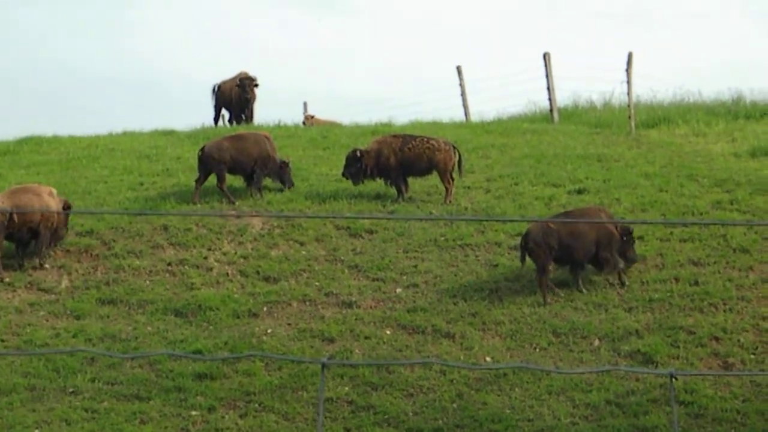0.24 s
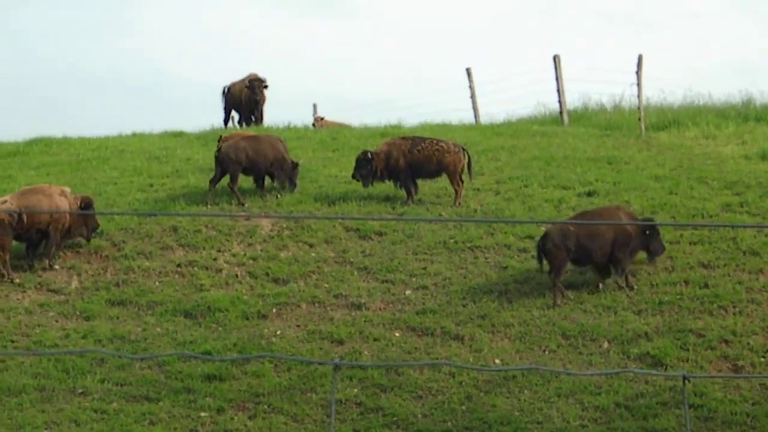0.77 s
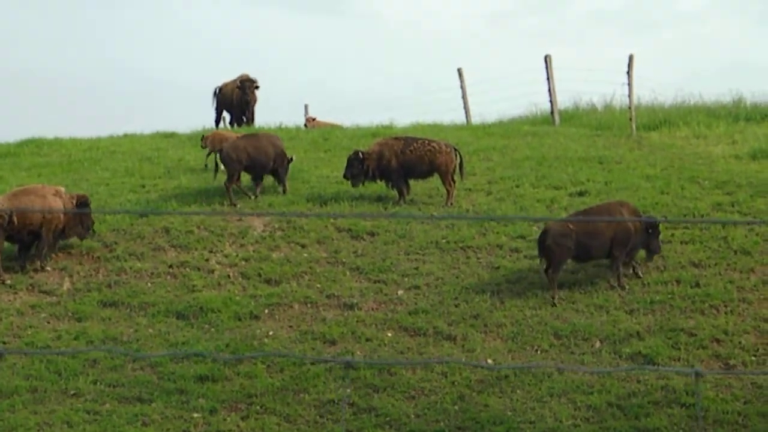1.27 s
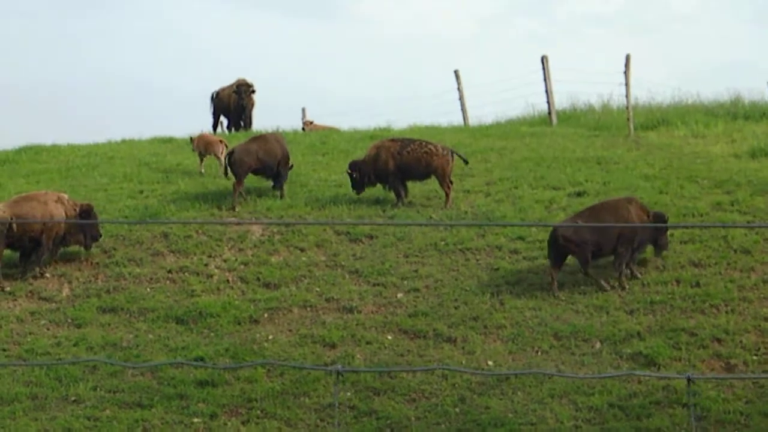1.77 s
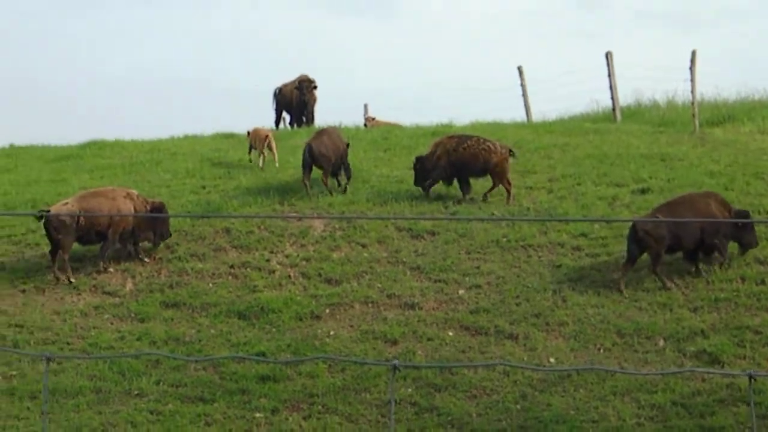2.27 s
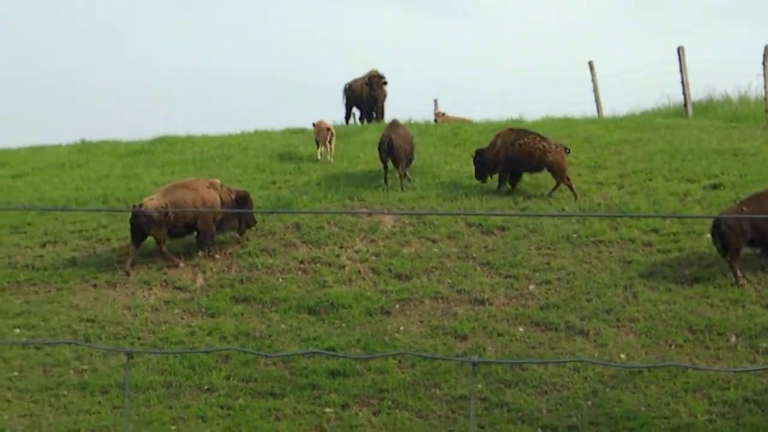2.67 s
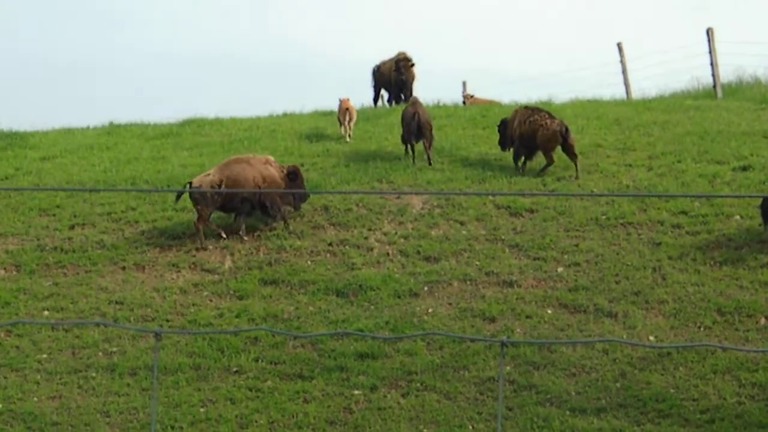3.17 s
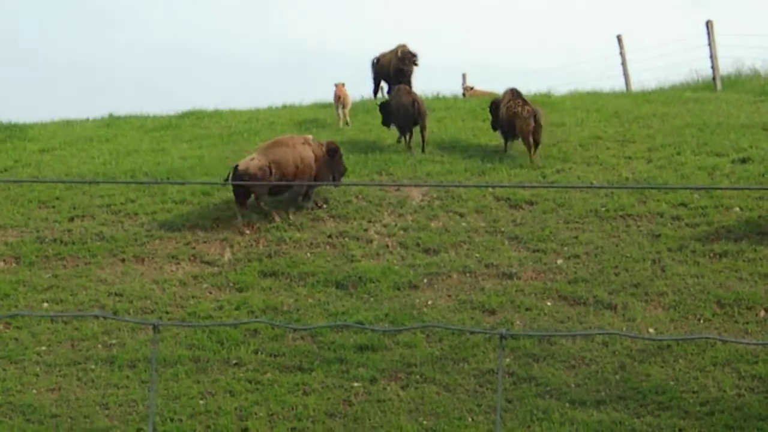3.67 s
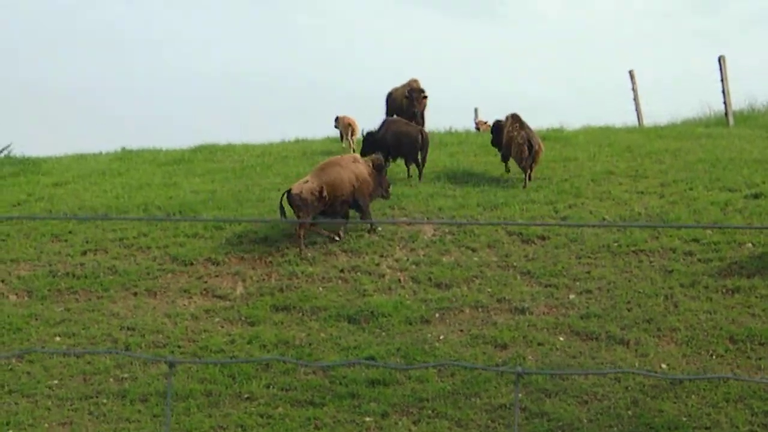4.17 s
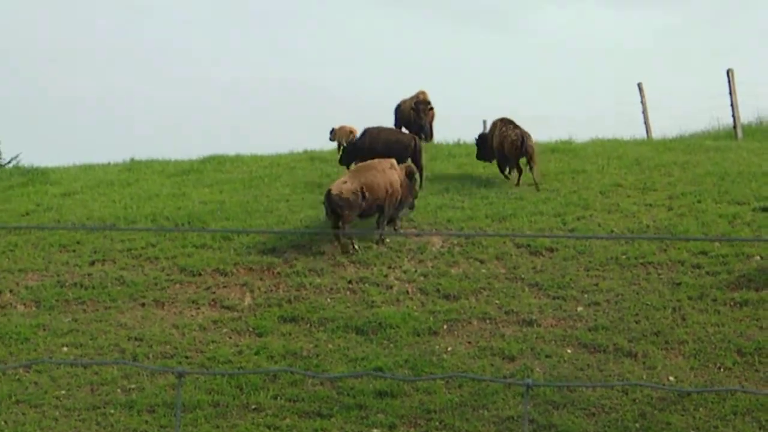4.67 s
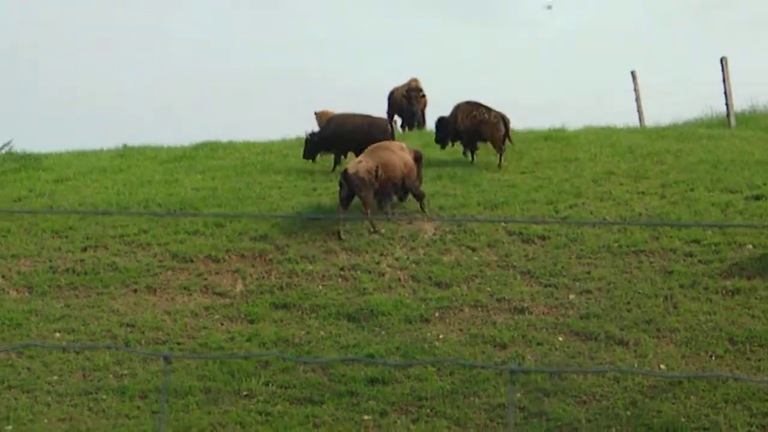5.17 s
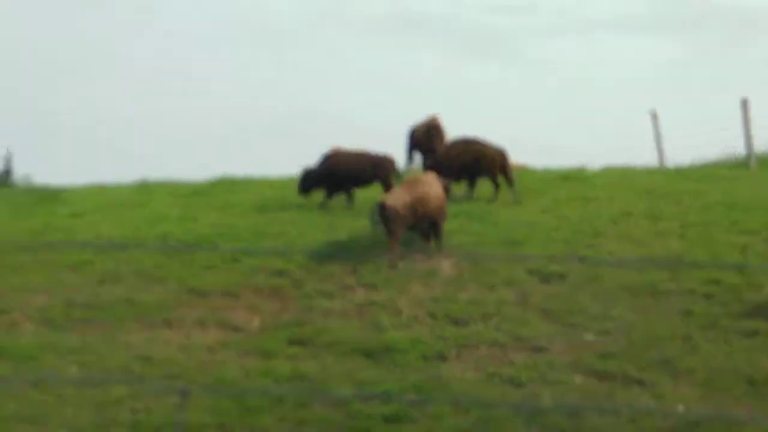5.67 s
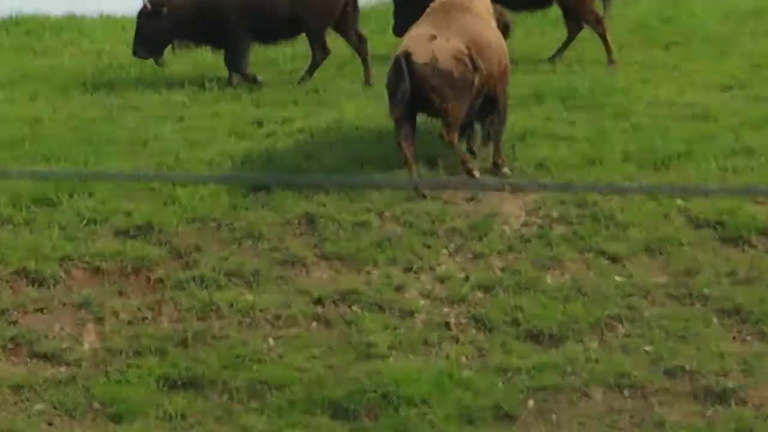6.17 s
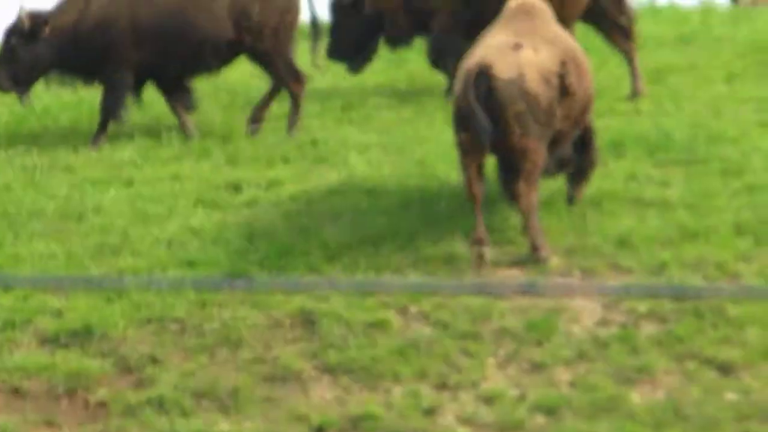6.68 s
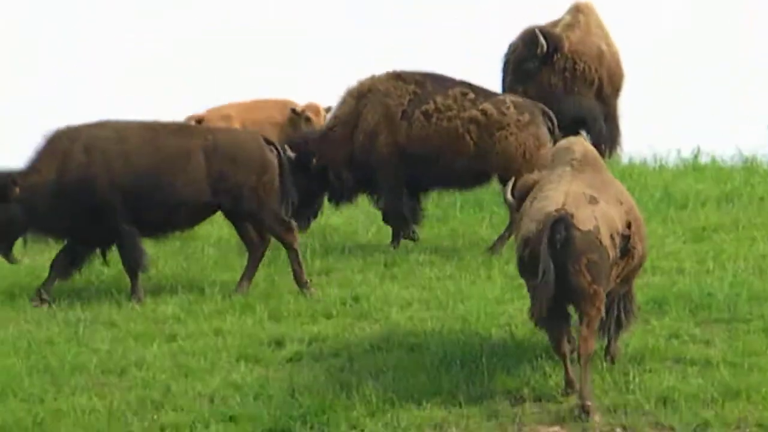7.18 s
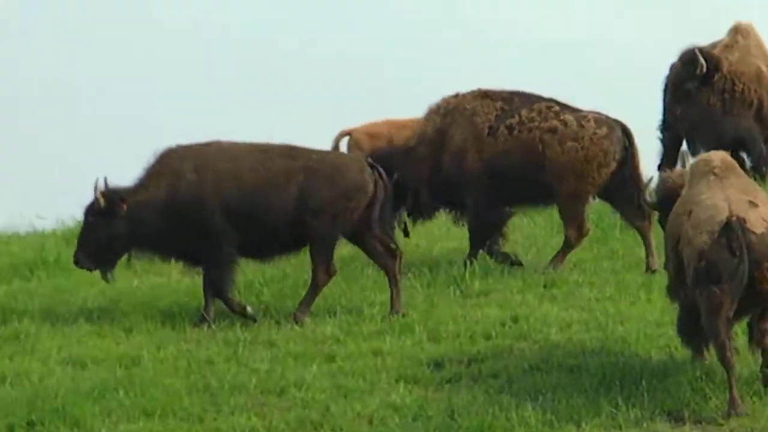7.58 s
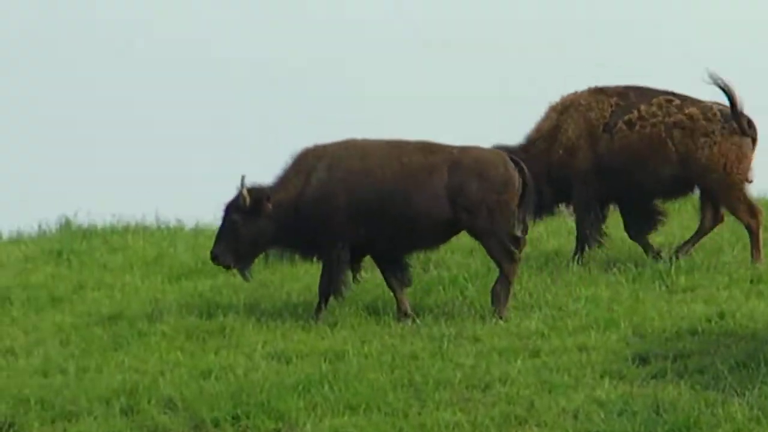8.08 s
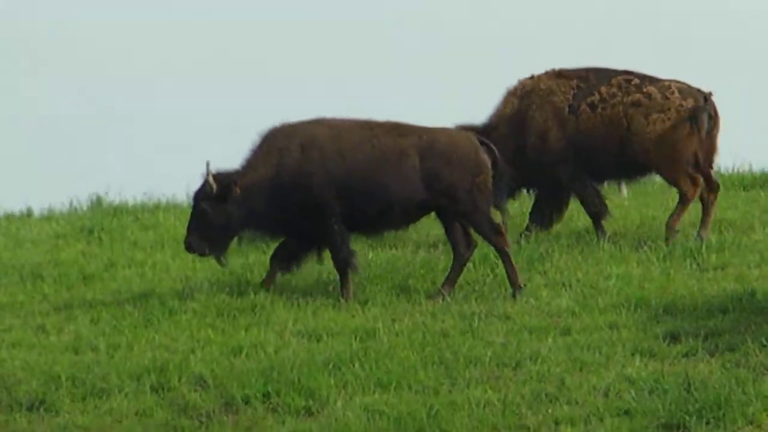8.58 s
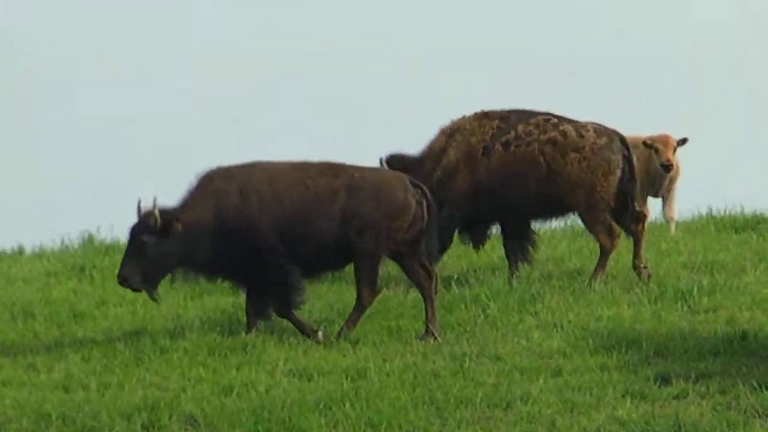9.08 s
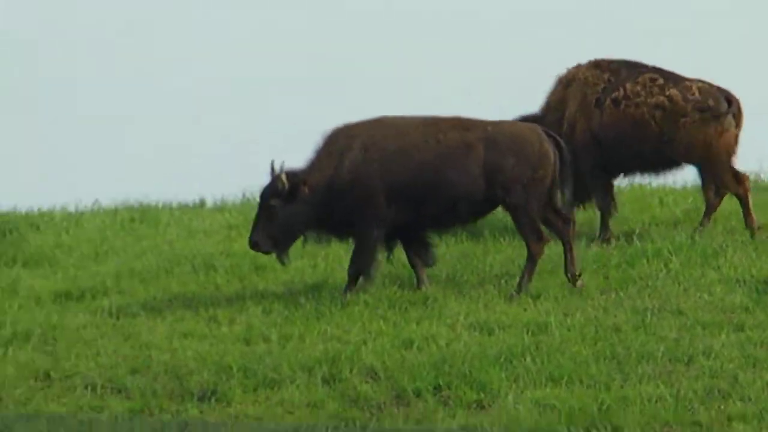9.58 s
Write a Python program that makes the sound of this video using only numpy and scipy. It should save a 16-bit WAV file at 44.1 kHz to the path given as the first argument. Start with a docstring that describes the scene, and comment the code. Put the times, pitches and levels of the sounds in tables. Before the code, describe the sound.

Crickets chirp and a small bird trills repeatedly, with two low rattling bison grunts and close camera knocks, clicks and zoom noise.

```python
"""A hillside pasture, where bison grunt twice, low and rattling, as their slack vocal folds flap.
Crickets scrape their wings without pause, a small bird whistles buzzy trills and others twitter.
Far off, something hoots, a peacock wails and an engine hums under the hiss and rumble of the air.
A hand-held camera adds noises of its own: the lens knocks, the zoom whirrs and the case clicks."""
import sys
import numpy as np
from scipy import signal
from scipy.fft import rfft, irfft
from scipy.io import wavfile
from scipy.ndimage import uniform_filter1d

SR = 44100
rng = np.random.default_rng(int(sys.argv[2]) if len(sys.argv) > 2 else 0)


def to_wav(s):
    """Save 16-bit WAV."""
    ch = np.atleast_2d(s).T  # columns
    pcm = np.round(np.clip(ch, -1, 1) * 32767)  # PCM
    wavfile.write(sys.argv[1], SR, pcm.astype(np.int16))


N = 433944
TIME = np.arange(N) / SR


def from_db(db):
    """Turn decibels into a number to multiply by."""
    return 10 ** (np.asarray(db) / 20)


def rms_one(x):
    """Scale a sound so that its average strength (rms) is 1."""
    return x / np.sqrt(np.mean(x ** 2) + 1e-20)


def gain_over_time(points):
    """Join (time_s, level_db) points into a gain for every sample."""
    times_s, levels_db = np.transpose(points)
    return from_db(np.interp(TIME, times_s, levels_db))


def gain_at_hz(points, hz):
    """Read the gain at any pitch from (pitch_hz, level_db) points."""
    pitches_hz, levels_db = np.transpose(points)
    return from_db(np.interp(np.log(hz + 1e-9), np.log(pitches_hz), levels_db))


def seconds(length):
    """The time of each sample in a short sound."""
    return np.arange(int(length * SR)) / SR


def add(out, start_s, sound):
    """Mix a sound into out at the given time."""
    start = int(round(start_s * SR))
    first, last = max(start, 0), min(start + len(sound), N)
    if last > first:
        out[first:last] += sound[first - start:last - start]


def drift(turns_per_s, size=N):
    """A smooth random wander, mostly between -1 and 1."""
    points = rng.standard_normal(int(size * turns_per_s / SR) + 2)
    return np.interp(np.arange(size) * turns_per_s / SR, np.arange(len(points)), points)


def phase_of(hz):
    """The growing angle of a tone whose pitch may glide."""
    return 2 * np.pi * np.cumsum(hz) / SR + rng.uniform(0, 2 * np.pi)


def off_peak(progress, peak):
    """How far a call is from its top: 0 where progress equals peak, 1 at both ends."""
    return np.where(progress < peak, 1 - progress / peak, (progress - peak) / (1 - peak)) ** 2


def held(t, length, rise_s, fall_s):
    """Rise from 0 to 1, stay there, and fall back."""
    return np.clip(np.minimum(t / rise_s, (length - t) / fall_s), 0, 1)


def resonate(drive, modes):
    """Make a body ring. Each (pitch_hz, width_hz, level_db) tone swells and dies, sooner if wide."""
    t = seconds(1 / 8)
    ring = np.zeros(len(t))
    for hz, width_hz, db in modes:
        age = np.pi * width_hz * t
        ring += from_db(db) * age * np.exp(1 - age) * np.sin(2 * np.pi * hz * t)
    return signal.fftconvolve(drive, ring)[:len(drive)]


def echo(x, fade_s):
    """A blurred echo from hillside and trees, as strong as the sound itself."""
    t = seconds(fade_s)
    tail = rng.standard_normal(len(t)) * from_db(-60 * t / fade_s)
    return signal.fftconvolve(x, tail / np.linalg.norm(tail))[:N]


# The tone of the open air: pitch_hz, relative_db
AIR_TONE = [(20, -15), (45, 1.5), (70, 6.5), (105, -1.5), (150, -2), (300, -10.5), (500, -14),
            (1000, -14.5), (2000, -16.5), (2600, -18.5), (3600, -16), (5300, -19), (7400, -16.5),
            (8300, -28.5)]
# Gusts on the microphone: peak_s, level_db
GUSTS = [(1.5, -45), (4.58, -40.5), (4.79, -42), (5.3, -50), (5.8, -48), (6.22, -38)]


def wind(hiss_db=-49.7, rumble_db=-62.5, rise_s=.05, fall_s=.11):
    """Air hisses steadily and rumbles on the microphone, more so in each gust."""
    tone = gain_at_hz(AIR_TONE, np.fft.rfftfreq(N, 1 / SR))
    hiss = rms_one(irfft(rfft(rng.standard_normal(N)) * tone, N))
    rumble = rms_one(resonate(rng.standard_normal(N), [(45, 45, 0)]))
    gusts = sum(from_db(db) * np.exp(-np.maximum((peak_s - TIME) / rise_s, (TIME - peak_s) / fall_s))
                for peak_s, db in GUSTS)
    return from_db(hiss_db) * hiss + (from_db(rumble_db) + gusts) * rumble


# The tones in the engine's hum: pitch_hz, relative_db
ENGINE_TONES = [(71, -2.5), (109, -15), (142, -26)]
# How loud the engine is over time: time_s, level_db
ENGINE_LEVELS = [(0, -51), (3.3, -50.5), (5, -46.5), (6.1, -49.5), (6.8, -51), (8.7, -48), (9.84, -43.5)]


def distant_engine(waver_db=2.5):
    """Three low tones drift up and down together as the engine's speed wanders."""
    speed = 1 + .045 * drift(5)
    hum = sum(from_db(db + waver_db * drift(10)) * np.sin(phase_of(hz * speed))
              for hz, db in ENGINE_TONES)
    return gain_over_time(ENGINE_LEVELS) * rms_one(hum)


# Short hoots: start_s, length_s
HOOTS = [(-.1, .19), (.35, .18), (1.16, 0.2), (1.76, 0.16), (2.25, .16), (2.56, 0.14), (3.68, .16),
         (3.99, .15), (4.66, .17), (5.48, 0.32)]
# Longer, falling howls: start_s, top_hz
HOWLS = [(.22, 619), (1.78, 619), (2.62, 570), (3.38, 613), (4.04, 565)]


def far_hoots(hoot_hz=495):
    """Soft, pure calls rise and fall in pitch; the longer a hoot, the louder it is."""
    def call(length_s, top_hz, db, sag, peak):
        progress = seconds(length_s) / length_s
        pitch = top_hz * (1 - sag * off_peak(progress, peak))
        return from_db(db) * np.sin(phase_of(pitch)) * signal.windows.tukey(len(pitch), .3)

    out = np.zeros(N)
    for start_s, length_s in HOOTS:
        top_hz = hoot_hz * (1 + .015 * rng.normal())
        add(out, start_s, call(length_s, top_hz, db=-64 + 42 * length_s, sag=.16, peak=.56))
    for start_s, top_hz in HOWLS:
        add(out, start_s, call(.42, top_hz, db=-62.5, sag=.13, peak=.15))
    return out + from_db(-10) * echo(out, fade_s=.46)


# Peacock wails: start_s, base_level_db
WAILS = [(9.02, -46), (9.75, -47.5)]
# How the peacock's beak lifts or dulls each pitch: pitch_hz, gain_db
BEAK_TONE = [(650, -5.5), (1200, 3), (1400, -22.5), (1800, 3), (2030, 0), (2350, 2), (2700, -5), (3400, 3),
             (4100, -4.5), (4800, -27), (5450, -4.5), (6100, -14), (7500, -16), (9000, -23)]


def peacock(length_s=.57, top_hz=683, sag_hz=124.8, fade_db=13):
    """A nasal wail rises and falls, loudest and brightest at the top; its tones waver in the air."""
    out, progress = np.zeros(N), seconds(length_s) / length_s
    size = len(progress)
    slack = off_peak(progress, peak=.55)
    pitch = top_hz - sag_hz * slack
    soft_ends = signal.windows.tukey(size, .2)
    for start_s, db in WAILS:
        phase = phase_of(pitch * (1 + .0051 * drift(201.6, size)))
        for harmonic in range(1, 12):   # whole multiples of the pitch
            tone_db = db - fade_db * slack * (1 + .097 * (harmonic - 1)) + 5 * drift(17.9, size)
            tone = gain_at_hz(BEAK_TONE, harmonic * pitch) * np.sin(harmonic * phase)
            add(out, start_s, from_db(tone_db) * tone * soft_ends)
    return out + from_db(-6) * echo(out, fade_s=.99)


# Twittered phrases: start_s, note_count, lowest_hz, base_level_db
TWITTERS = [(.15, 1, 3160, -59), (.35, 2, 3510, -47.5), (.465, 1, 3400, -55), (.645, 1, 3310, -58),
            (.41, 1, 5500, -58), (1.041, 1, 3170, -52.5), (1.78, 2, 3370, -55), (2.022, 1, 3420, -50),
            (2.887, 1, 3430, -52), (5.9, 1, 5550, -53), (7.274, 1, 3080, -54), (7.855, 1, 3180, -55),
            (8.59, 1, 5550, -55), (8.14, 1, 3230, -51.5), (8.9, 1, 3190, -57), (9.06, 2, 3150, -55),
            (9.245, 1, 5650, -53)]


def twittering_birds(note_s=.05, swoop_hz=1300, ragged_hz=130, boost_db=1.5):
    """Small birds whistle thin, ragged notes, each one a swoop down and back up."""
    out, progress = np.zeros(N), seconds(note_s) / note_s
    size = len(progress)
    soft_ends = signal.windows.tukey(size, .4)
    far_notes = [(start_s, 1, 3170, -58) for start_s in rng.uniform(0, N / SR, 8)]
    for start_s, notes, lowest_hz, db in TWITTERS + far_notes:
        for k in range(notes):
            turn = rng.uniform(.4, .65)
            gain = from_db(db + boost_db + 3 * drift(150, size))
            pitch = lowest_hz + swoop_hz * (2 * (progress - turn)) ** 2 + ragged_hz * drift(400, size)
            add(out, start_s + k * note_s, gain * np.sin(phase_of(pitch)) * soft_ends)
    return out + from_db(-3) * echo(out, fade_s=.13)


def add_chirp(out, last_stroke_s, hz, db, strokes, stroke_s=.026, spacing_s=.035, fall_hz=380):
    """Mix in one cricket chirp: each wing stroke falls in pitch and is louder than the one before."""
    progress = seconds(stroke_s) / stroke_s
    for k in range(strokes):   # counting back from the last stroke
        middle_s = last_stroke_s - k * spacing_s * (1 + .03 * rng.normal())
        pitch = hz + 25 * rng.normal() + fall_hz * (1 / 3 - progress ** 2)
        stroke = np.sin(np.pi * progress) * np.sin(phase_of(pitch))
        add(out, middle_s - stroke_s / 2, from_db(db - 2 * k) * stroke)


# How the far crickets swell and fade: time_s, base_level_db
CHORUS_LEVELS = [(0, -41.5), (3, -44), (6.5, -42.5), (7.9, -44.5), (8.7, -46), (9.84, -45.5)]


def far_crickets(chirp_count=90):
    """Several crickets are blurred by echoes, and countless others melt into a high haze."""
    chirps = np.zeros(N)
    for time_s in np.linspace(0, N / SR, chirp_count):
        db = 2 * rng.normal()
        add_chirp(chirps, time_s + .05 * rng.normal(), hz=4540 + 80 * rng.normal(), db=db, strokes=4)
    blurred = rms_one(chirps + .5 * echo(chirps, fade_s=.15))
    haze = rms_one(resonate(rng.standard_normal(N), [(4480, 620, 0)]))
    return gain_over_time(CHORUS_LEVELS) * (from_db(-7.5) * blurred + from_db(-6) * haze)


# Runs of chirps: first_chirp_s, last_chirp_s, chirp_count, base_level_db
CHIRP_RUNS = [(.03, 1.04, 5, -41), (1.369, 1.37, 1, -39.5), (1.53, 2.28, 4, -40.5), (2.556, 3.86, 4, -43.5),
              (4.339, 5.36, 3, -43), (5.532, 6.1, 2, -43), (6.48, 7.295, 4, -39.5), (7.619, 7.6, 4, -38)]


def near_cricket(boost_db=5):
    """One cricket close by scrapes its wings in runs of evenly paced chirps."""
    out = np.zeros(N)
    for first_s, last_s, count, db in CHIRP_RUNS:
        for time_s in np.linspace(first_s, last_s, count):
            add_chirp(out, time_s, hz=4370, db=db + boost_db, strokes=3)
    return out


# Fingers pressing the camera case: start_s, snap_db, thump_db, snap_pitch_hz
CASE_CLICKS = [(1.49, -24.5, -50, 760), (1.58, -28.5, -41, 2000), (1.607, -30.5, -54, 1590),
               (4.786, -22, -31.5, 700), (5.035, -28, -46, 2000), (5.351, -15.5, -17, 1950),
               (5.648, -36.5, -22.5, 700), (6.144, -23.5, -15, 555), (6.207, -25.5, -25, 2670),
               (6.217, -23.5, -20, 2390), (6.237, -24.5, -25, 1700), (6.247, -28, -31, 1710)]
# How the plastic case rings: pitch_hz, width_hz, relative_db
CASE_RING = [(822, 500, -9), (1180, 830, -7.5), (1630, 1280, 0), (2647, 550, -5.5), (5580, 2200, 2),
             (7620, 600, -5)]


def case_clicks(crack_s=.0047, thump_hz=128, thump_width_hz=85):
    """Plastic snaps in a tiny burst, pitched by where it is pressed, and the whole body thumps."""
    out, t = np.zeros(N), seconds(.06)
    for start_s, snap_db, thump_db, hz in CASE_CLICKS:
        burst = resonate(rng.standard_normal(len(t)) * np.exp(-t / crack_s), CASE_RING)
        band = signal.butter(1, [hz / 1.59, hz * 1.59], "band", fs=SR, output="sos")
        snap = signal.sosfilt(band, burst)
        thump = resonate(signal.unit_impulse(len(t)), [(thump_hz, thump_width_hz, thump_db)])
        add(out, start_s, from_db(snap_db) * snap / np.abs(snap).max() + thump)
    return out


# When the zoom motor runs: start_s, end_s, level_db
ZOOM_RUN = (5.62, 6.40, -32)
# How the housing rings around the gears: pitch_hz, width_hz, relative_db
HOUSING_RING = [(138.5, 61, -0.5), (274, 78, 1.5), (570, 154, -10.5), (823, 124, -13), (1320, 810, -8)]


def zoom_motor(turns_per_s=22, teeth_per_s=140, throb_db=4, hiss_db=-21, fade_db=15.5):
    """Gear teeth rattle the housing, throbbing with each turn, while the sliding lens tube hisses."""
    turn = np.sin(phase_of(turns_per_s * (1 + .17 * drift(10))))
    teeth_passed = np.floor(phase_of(teeth_per_s * (1 + .28 * drift(200))) / (2 * np.pi))
    strikes = np.diff(teeth_passed, prepend=teeth_passed[0])
    grit = .88 * rng.standard_normal(N) * np.sqrt(teeth_per_s / SR)
    whirr = resonate(strikes + grit, HOUSING_RING)
    whirr /= np.sqrt(uniform_filter1d(whirr ** 2, size=SR // 25) + 1e-9)   # the motor pushes steadily
    sound = rms_one(whirr * from_db(throb_db * turn)) + from_db(hiss_db) * rng.standard_normal(N)
    start_s, end_s, db = ZOOM_RUN
    power = held(TIME - start_s, end_s - start_s, rise_s=.17, fall_s=.044)
    return sound * from_db(db - fade_db * (1 - power)) * (power > 0)


# The lens hunting for focus: start_s, end_s, first_knock_s, knock_spacing_s, knock_db
FOCUS_HUNTS = [(.04, .645, .167, .2, -27.5), (1.18, 1.62, 1.298, .198, -27.5),
               (1.65, 1.76, 1.669, .2, -28.5), (2.25, 2.85, 2.373, 0.2, -27.5),
               (3.39, 3.99, 3.514, 0.2, -28), (4.49, 4.70, 4.507, 0.11, -29),
               (4.72, 5.03, 4.784, .132, -29), (5.04, 5.29, 5.209, .2, -28), (5.56, 5.6, 5.575, .2, -31.5),
               (6.65, 7.05, 6.67, .304, -29), (7.06, 7.32, 7.078, .31, -31),
               (7.85, 8.27, 7.977, 0.1, -30.5), (9.29, 9.58, 9.304, .3, -27.5)]
# One hit of the lens and its two bounces: delay_s, relative_db
LENS_BOUNCES = [(0, -2), (0.0138, -10), (.028, -19)]
# How the lens tube rings after a knock: pitch_hz, width_hz, gain_db
KNOCK_RING = [(266, 69.4, 0.5), (308.7, 40.7, -5.5), (730, 71, -32.5), (1019, 66, -20), (1580, 82, -22),
              (1843, 70, -28.5)]
# The ring of one small step: pitch_hz, width_hz, gain_db
TICK_RING = [(146.5, 58, -4), (265.4, 93, -1), (1050, 200, -17.5), (1550, 180, -18.5)]


def focus_motor(rough_step_s=.05):
    """The lens creeps in ticking steps and knocks each time it turns round; every move bounces."""
    knocks, ticks = np.zeros(N), np.zeros(N)
    for start_s, end_s, first_knock_s, spacing_s, knock_db in FOCUS_HUNTS:
        steps_per_knock = round(spacing_s / rough_step_s)
        step_s = spacing_s / steps_per_knock
        first_step = int(np.ceil((start_s - first_knock_s) / step_s))
        last_step = int((end_s - first_knock_s) / step_s)
        for step in range(first_step, last_step + 1):
            move_s = first_knock_s + step * step_s
            stray_s = .005 * rng.normal()
            tick_db = -36.5 + 4 * rng.normal()
            for delay_s, bounce_db in LENS_BOUNCES:
                hit_s = move_s + delay_s * (1 + .12 * rng.normal())
                if step >= 0 and step % steps_per_knock == 0:
                    add(knocks, hit_s, [from_db(knock_db + bounce_db)])
                else:
                    add(ticks, hit_s + stray_s, [from_db(tick_db + bounce_db)])
    return resonate(knocks, KNOCK_RING) + resonate(ticks, TICK_RING)


# Buzzy bird calls: start_s, length_s, base_level_db, hoarseness (0 to 1)
BUZZY_CALLS = [(1.132, .17, -39, 0.7), (2.565, 0.17, -33, 0.74), (3.627, .2, -28, .25),
               (4.528, 0.23, -31, .61), (5.446, .23, -28, 0.4), (6.395, .22, -25, 0.25),
               (7.541, .2, -26, 0.35)]


def buzzing_bird(middle_hz=3640, beak_hz=3790, beak_width_hz=650, fade_db=15.5, boost_db=1.28):
    """A whistle jumps up and slides down some fifty times a second, past the pitch the beak rings at."""
    out = np.zeros(N)
    for start_s, length_s, db, hoarseness in BUZZY_CALLS:
        progress = seconds(length_s) / length_s
        size = len(progress)
        trills_per_s = (62 - 16 * progress) * (1 + .046 * drift(40, size))
        trill = phase_of(trills_per_s)
        slide = signal.sawtooth(trill, width=.3)
        depth = .12 * np.minimum(1, 1 / 4 + 2 * progress)   # the trill widens as the call goes on
        climb = .13 * (progress - .5)
        rasp = .083 * hoarseness * drift(2000, size)
        pitch = middle_hz * (1 + climb + depth * slide + rasp)
        phase = phase_of(pitch)
        beak_gain = 1 / np.hypot(1, 2 * (pitch - beak_hz) / beak_width_hz)
        whistle = np.sin(phase) * from_db(4.5 * slide) * beak_gain
        falling = (.5 - .5 * np.sin(trill - np.pi / 8)) ** 2   # the octave sounds on the way down
        octave = np.sin(2 * phase) * from_db(-13.5 + 5.5 * hoarseness) * falling
        call_db = db + boost_db - fade_db * off_peak(progress, peak=.57) + 2 * drift(68.8, size)
        call = (whistle + octave) * from_db(call_db) * signal.windows.tukey(size, .1)
        add(out, start_s, call)
        add(out, start_s + .0054, from_db(-8) * call)   # a bounce off the ground roughens the trill
    return out + from_db(-8) * echo(out, fade_s=.51)


# Bison grunts: start_s, length_s, flaps_per_s, level_db, mouth_gain_db
GRUNTS = [(.759, .39, 32, -29.8, -2), (8.301, 0.41, 32.5, -31.5, -8)]
# The deep ring of the throat: pitch_hz, width_hz, gain_db
THROAT_RING = [(67.3, 28, -10), (105.7, 53, 0.5), (235, 69, -5), (347.6, 49, -8.5)]
# The higher ring of the mouth: pitch_hz, width_hz, gain_db
MOUTH_RING = [(410, 150, -5.5), (548, 98, -20.5), (1170, 95, -20), (1380, 90, -18.5), (1612, 72, -20.5),
              (1897, 80, -23)]


def bison(fade_db=9, rasp=.035, rasp_s=.018):
    """Slack vocal folds flap slowly; each flap and its raspy puff of air ring the throat and mouth."""
    out, t = np.zeros(N), seconds(.036)
    for start_s, length_s, flaps_per_s, db, mouth_db in GRUNTS:
        flaps, puffs, elapsed_s = np.zeros(N), np.zeros(N), 0
        while elapsed_s < length_s:
            effort = held(elapsed_s, length_s, rise_s=.086, fall_s=.089)
            strength = from_db(db - fade_db * (1 - effort) + .9 * rng.normal())
            puff = strength * rasp * rng.standard_normal(len(t)) * np.exp(-t / rasp_s)
            add(puffs, start_s + elapsed_s, puff)
            add(flaps, start_s + elapsed_s, puff + strength * signal.unit_impulse(len(t)))
            elapsed_s += (1 + .02 * rng.normal()) / flaps_per_s
        mouth = resonate(flaps, MOUTH_RING) + from_db(10.5) * puffs
        out += resonate(flaps, THROAT_RING) + from_db(mouth_db) * mouth
    return out


def scene():
    """The pasture and the camera together, in one channel."""
    animals = bison() + buzzing_bird() + twittering_birds() + near_cricket()
    background = far_crickets() + peacock() + far_hoots() + wind() + distant_engine()
    camera = focus_motor() + zoom_motor() + case_clicks()
    return (background + camera + animals)[None]


def record(dry, cutoff_hz=8500):
    """Cut away the highest treble steeply."""
    return signal.sosfilt(signal.ellip(10, .1, 80, cutoff_hz, fs=SR, output="sos"), dry)


dry = scene()
out = record(dry)
to_wav(out)
```